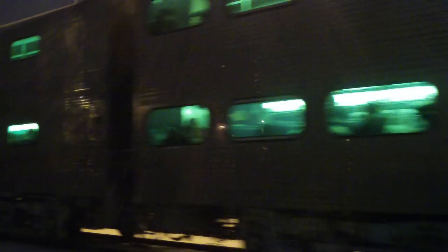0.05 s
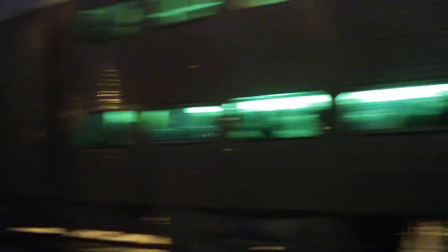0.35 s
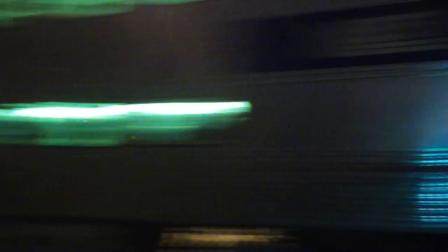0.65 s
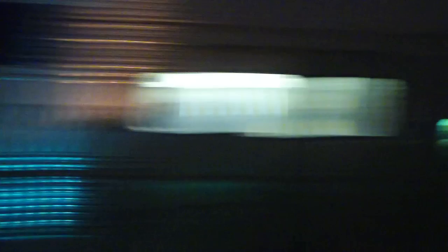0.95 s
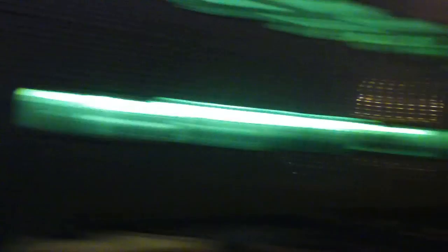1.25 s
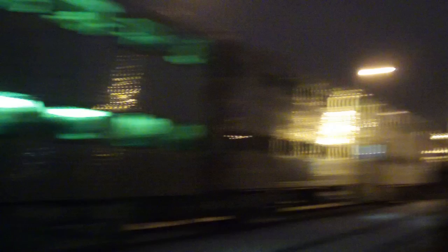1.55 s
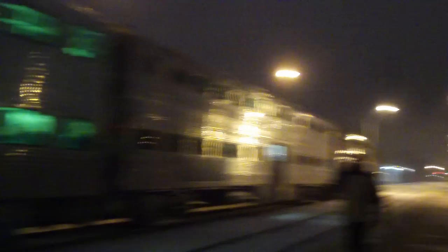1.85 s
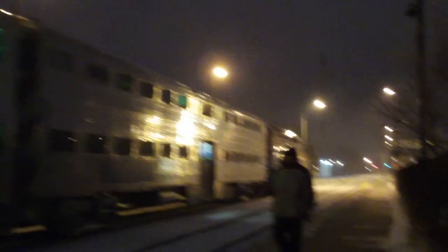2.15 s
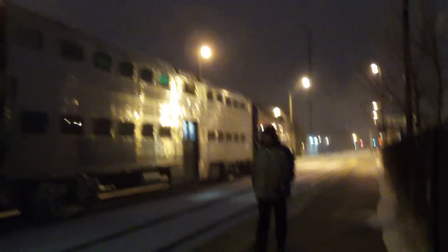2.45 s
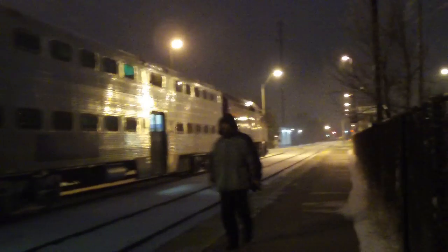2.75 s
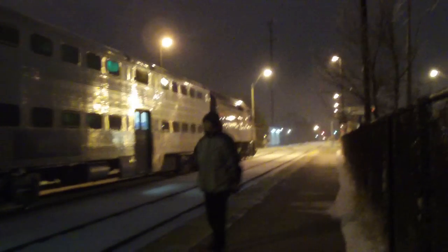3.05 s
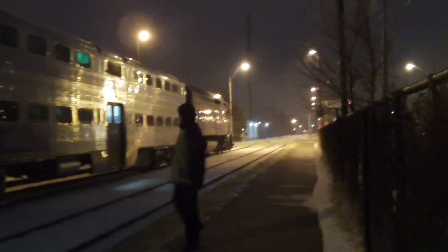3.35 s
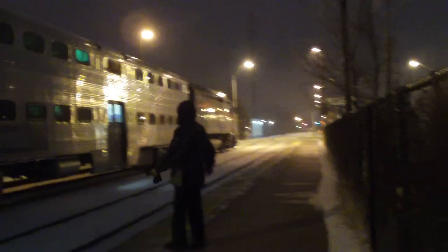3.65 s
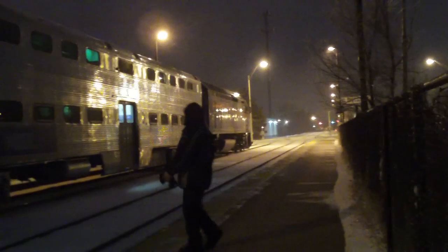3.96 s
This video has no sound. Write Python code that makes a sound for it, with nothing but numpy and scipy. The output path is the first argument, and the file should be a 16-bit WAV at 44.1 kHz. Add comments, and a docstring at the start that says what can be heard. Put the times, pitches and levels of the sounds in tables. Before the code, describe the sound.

A diesel train slows with a throbbing rumble, hissing brake air and a clanging bell.

```python
"""A deep, throbbing exhaust and rumbling wheels: a diesel train slows along a platform at night.
The exhaust throbs once per turn of the engine's shaft, and the gears whine lower as speed drops.
The train's bell swings at a steady beat; a smaller, quicker bell rings far off. Brake air spits
and then hisses on, the brake shoes rub, squeal and grab, and small hard parts tick."""
import sys
import numpy as np
from scipy import signal
from scipy.fft import rfft, irfft
from scipy.io import wavfile
from scipy.ndimage import map_coordinates

SR = 44100
rng = np.random.default_rng(int(sys.argv[2]) if len(sys.argv) > 2 else 0)


def transcribe(signal):
    """Save signal, clipped to [-1, 1], as a 16-bit WAV file at the path in sys.argv[1]."""
    frames = np.atleast_2d(signal).T
    limited = np.clip(frames, -1, 1)
    pcm = np.round(limited * 32767).astype(np.int16)
    wavfile.write(sys.argv[1], SR, pcm)


N = 176400


def undb(db):
    """Turn decibels (dB) into a number to multiply by."""
    return 10 ** (np.asarray(db) / 20)


def unit(x):
    """Scale a signal so that its average strength (rms) is 1."""
    return x / np.sqrt(np.mean(x ** 2))


def curve(t, rows, column=1):
    """Follow one column of a table over time, in straight lines from row to row."""
    rows = np.array(rows)
    return np.interp(t, rows[:, 0], rows[:, column])


def swell(t, at, spread):
    """A smooth hill that rises to 1 and falls again."""
    return np.exp(-.5 * ((t - at) / spread) ** 2)


def wander(rate_hz):
    """A smooth random wobble of about size 1; a higher rate makes it quicker."""
    freqs = np.arange(N + 1) * SR / (2 * N)
    spectrum = rfft(rng.standard_normal(2 * N)) * np.exp(-(freqs / rate_hz) ** 2)
    return unit(irfft(spectrum))[:N]


def noise(colour):
    """Noise shaped by rows of pitch in Hz and level in dB, fading out below the first row."""
    freqs = np.arange(1, N // 2 + 2) * SR / N
    hz, db = np.array(colour).T
    gain = undb(np.interp(np.log(freqs), np.log(hz), db)) * np.minimum(freqs / hz[0], 1) ** 2
    return unit(irfft(rfft(rng.standard_normal(N)) * gain, N))


def resonance(hz, width_hz):
    """Noise ringing around one pitch: the narrower it is, the more like a note."""
    freqs = np.arange(N // 2 + 1) * SR / N
    damping = (1 + ((freqs - hz) / width_hz * 2) ** 4) ** .5
    return unit(irfft(rfft(rng.standard_normal(N)) / damping, N))


def engine(t):
    """The muffler rounds the firings into a deep tone that sags once a turn; a generator hums along."""
    # Each row: time in seconds, level in dB, depth of the throb from 0 to 1.
    exhaust = [(0, -16.5, 0.49), (.8, -12.5, 0.83), (1.45, -13, 0.82), (2.1, -11.5, 0.79), (2.8, -12, 0.71),
               (3.3, -10.5, 0.72), (3.7, -8.5, 0.52), (4, -7, 0.85)]
    # Each row: pitch as a multiple of the shaft's speed, level in dB.
    overtones = [(5, -30), (6, -33), (16, -37), (17, -45.5), (19, -53), (25, -45)]
    # Each row: pitch in Hz, level in dB.
    generator_hum = [(120, -41), (180, -46.5)]
    shaft_hz, firings_per_turn = 8.548, 8
    first_dip_s, dip_width_turns, bend_radians = .057, .29, .043
    turns = shaft_hz * (t - first_dip_s) + .01 * wander(1.56)
    dip = swell(np.sin(np.pi * turns), 0, np.pi * dip_width_turns)
    throb = 1 - curve(t, exhaust, column=2) * dip
    firing = np.sin(2 * np.pi * firings_per_turn * turns - bend_radians * np.sin(2 * np.pi * turns))
    out = unit(throb * firing) * undb(curve(t, exhaust) + .5 * wander(36))
    for multiple, db in overtones:
        out += undb(db + 2 * wander(1)) * unit(np.sin(2 * np.pi * (multiple * turns + rng.random())))
    for hz, db in generator_hum:
        out += undb(db + 2 * wander(6.3)) * unit(np.sin(2 * np.pi * hz * t))
    return out


def wheels(t):
    """Rolling wheels rumble, and the nearest ones murmur as they pass."""
    # Each row: pitch in Hz, relative level in dB.
    rumble_colour = [(15, -28), (28, 1), (50, -2.5), (85, 1.5), (105, -8), (160, -13.5), (260, -14.5),
                     (400, -18.5), (550, -23.5), (1100, -27.5), (1600, -30), (2300, -32), (3800, -43.5),
                     (8000, -41.5), (12500, -50.5), (15000, -60)]
    # Each row: pitch and width in Hz, loudest moment and spread in seconds, level in dB.
    murmurs = [(625, 180, 0.42, 0.43, -43), (376, 69, .1, 0.38, -41.5), (180, 59, 2.2, 0.77, -37.5),
               (338, 78, 4.02, 0.79, -38)]
    out = noise(rumble_colour) * undb(-24.5 + 1.4 * wander(2.1))
    for hz, width, at, spread, db in murmurs:
        out += undb(db) * swell(t, at, spread) * resonance(hz, width)
    return out


def gears(t):
    """The gears whine, sinking in pitch as the train slows."""
    # Each row: starting pitch in Hz, loudest moment and spread in seconds, level in dB,
    # wobble in radians.
    whines = [(434.7, 1.34, 0.51, -38.5, .6), (276.4, 1.83, .65, -37, 0.76), (283, 3.66, 0.86, -39.5, 1.25)]
    slowing_per_s = .057  # share of the starting speed lost each second
    travel = t - slowing_per_s * t ** 2 / 2
    out = 0
    for hz, at, spread, db, wobble in whines:
        level = undb(db + 2.5 * wander(14)) * swell(t, at, spread)
        out += level * unit(np.sin(2 * np.pi * hz * travel + wobble * wander(14)))
    return out


def bell_stroke(t, at, modes, favoured_hz=None):
    """Each of a struck bell's notes (modes) builds, wavers and dies; the station's echo lingers."""
    echo_db, echo_fade_s, favour_db = -27, 1, 6
    age = np.maximum(t - at, 0)
    echo_shape = (1 - np.exp(-age / .017)) * undb(-60 * age / echo_fade_s)
    out = 0
    for hz, db, fade, rise, waver_hz, depth in modes:
        waver = 1 + depth * np.cos(2 * np.pi * waver_hz * age)
        level = (1 - np.exp(-age / rise)) * undb(-60 * age / fade) * waver
        tone = np.sin(2 * np.pi * (hz * age + rng.random()))
        shimmer = .12 * hz / modes[0][0] * resonance(hz, width_hz=hz / 45)
        echo = level.max() * undb(echo_db) * echo_shape * resonance(hz, width_hz=10)
        boost_db = favour_db * swell(hz, favoured_hz, favoured_hz / 10) if favoured_hz else 0
        out += undb(db + boost_db) * (level * (tone + shimmer) + echo)
    return out


def train_bell(t):
    """The train's bell swings and is struck at a steady beat."""
    # Each row: pitch in Hz, relative level in dB, seconds to fade by 60 dB, seconds to build up,
    # wavers per second, depth of the waver from 0 to 1.
    modes = [(2303, -0.5, 0.71, 0.0035, 19, 0.06), (2062, 10.5, 0.29, 0.09, 3.9, 0.5),
             (3120, -23, 0.94, .002, 24, 0.4), (3800, -12.5, 0.66, 0.0017, 33.4, .55),
             (5800, -23.5, 0.58, .002, 27, .4), (6100, -19, .35, 0.0018, 41, 0.4),
             (9846, -21, 0.4, .002, 30, .4)]
    # Each row: start in seconds, relative level in dB.
    strokes = [(-.15, -24), (.652, -20), (1.572, -28.5), (2.489, -37), (3.389, -30)]
    return sum(undb(db) * bell_stroke(t, at, modes) for at, db in strokes)


def far_bell(t):
    """A smaller bell rings far off; each hit of its clapper brings out one note."""
    # Each row: the same columns as the modes of the train's bell.
    modes = [(2121, 0, .7, .003, 9, .3), (2693, -7, .7, .003, 13, .3), (3306, -3, .35, .002, 21, .4),
             (3955, -7, .4, .002, 17, .4), (4850, -5, .2, .002, 29, .4), (6142, -5, .2, .002, 33, .4)]
    # Each row: start in seconds, relative level in dB, pitch of the favoured note in Hz.
    strokes = [(0, -50, 2121), (.9, -48, 2121), (1.509, -38, 2121), (1.81, -39, 3306), (2.429, -42, 2121),
               (2.69, -43, 2693), (2.986, -37.5, 2121), (3.284, -37.5, 6142), (3.575, -38, 3306),
               (3.884, -39.5, 4850)]
    return sum(undb(db) * bell_stroke(t, at, modes, hz) for at, db, hz in strokes)


def shoe_rub(t):
    """The brake shoes ring and chatter as they rub on the wheels."""
    # Each row: pitch and width in Hz, relative level in dB.
    shoe_notes = [(1164, 147, -0.5), (1048, 45, -10), (972, 73, -6), (720, 200, -3.5)]
    # Each row: time in seconds, level in dB.
    rub_level = [(0, -57), (.9, -42), (1.3, -40), (2.1, -37.5), (2.65, -36.5), (2.85, -37), (3.13, -35),
                 (3.22, -40), (3.36, -37), (3.45, -38), (4, -42)]
    chatter_hz, chatter_depth = 34.17, .21
    rub = unit(sum(resonance(hz, width) * undb(db) for hz, width, db in shoe_notes))
    chatter = 1 + chatter_depth * np.sin(2 * np.pi * chatter_hz * t + 2.5 * wander(8.2))
    return rub * chatter * undb(curve(t, rub_level))


def brake_air(t):
    """Air spits from a valve, then escapes in a long hiss that rings one resonance after another."""
    # Each row of both: pitch in Hz, relative level in dB.
    spit_colour = [(2400, -8), (3150, 1.5), (4100, -3), (5000, -4.5), (6200, -6.5), (7400, -1.5),
                   (8400, 1.5), (9500, -2.5), (10500, -3.5), (12400, 0), (13400, -5), (15000, -11)]
    hiss_colour = [(600, -14), (1300, 2.5), (1700, 2), (2200, 1.5), (2650, 3), (3300, 4), (4400, -1.5),
                   (4900, 0.5), (5900, -1.5), (6700, -0.5), (7200, 4), (8900, 3.5), (9800, 2), (11000, 3),
                   (12900, 8), (13500, -5.5), (15200, -4)]
    # Each row of both: time in seconds, relative level in dB.
    spit_level = [(.39, -51), (.43, -36), (.72, -33), (.86, -38.5), (1.05, -34.5), (1.3, -38), (3.5, -44),
                  (4, -47)]
    hiss_level = [(.96, -49), (1.1, -31), (1.3, -30), (1.55, -26.5), (1.9, -27.5), (2.4, -28), (3.1, -30),
                  (3.5, -33.5), (3.72, -33), (3.8, -34.5), (4, -39)]
    # Each row: pitch and width in Hz, loudest moment and spread in seconds, relative level in dB.
    air_notes = [(3280, 500, 1.19, 0.094, -39), (2950, 400, 1.254, 0.084, -36.5),
                 (8280, 600, 1.37, 0.22, -32), (9070, 510, 1.47, 0.19, -35), (10850, 650, 1.57, 0.065, -36),
                 (10800, 1400, 1.48, 0.36, -34), (12100, 550, 1.13, 0.083, -37),
                 (8100, 570, 1.85, 0.037, -35), (12540, 530, 2.24, 0.41, -34.5),
                 (12700, 580, 3.03, 0.26, -36), (13800, 1500, 2.2, .55, -40.5), (7150, 100, 4, 0.96, -44.5),
                 (4780, 250, 2.13, 0.68, -43.5), (6300, 170, 1.82, .07, -43), (8260, 170, 2.34, 0.091, -41),
                 (9300, 290, 2.36, .2, -42), (5250, 150, 3.32, 0.43, -46), (5560, 94, 3.6, 0.32, -48),
                 (3220, 310, 2.33, 0.16, -39), (3580, 340, 3, 0.26, -42), (4080, 380, 2.23, 0.21, -42),
                 (1680, 180, 1.52, 0.091, -43), (2160, 610, 3.9, 1, -41), (1410, 410, 3.56, .4, -44.5)]
    jet = noise(spit_colour) * undb(curve(t, spit_level))
    jet += noise(hiss_colour) * undb(curve(t, hiss_level))
    for hz, width, at, spread, db in air_notes:
        jet += resonance(hz, width) * swell(t, at, spread) * undb(db + .75 * wander(23))
    flicker_db = .62 * wander(48) + .53 * wander(4)
    return flutter(bounce(jet, t)) * undb(flicker_db)


def bounce(jet, t):
    """The hiss bounces off the ground and the train's sides; the slowly shifting echoes colour it."""
    # Each row: delay in milliseconds, relative level in dB, drift in milliseconds per second.
    reflections = [(.9, -30, 0.016), (2.3, -25, -0.043), (3.7, -16, 0.015), (6.1, -14.5, 0.065),
                   (11.3, -17, -0.036)]
    echoes = 0
    for delay_ms, db, drift in reflections:
        sent_at = t - (delay_ms + drift * t) / 1000
        echoes += undb(db) * map_coordinates(jet, [sent_at * SR], order=3, mode="mirror")
    return (jet + echoes) * undb(-1.35)


def flutter(jet):
    """Each narrow band of pitches in the air jet swells and sinks on its own."""
    band_hz, depth_db, rate_hz = 330, 1.5, 7
    freqs, times, bands = signal.stft(jet, SR, nperseg=512)
    chance = rng.standard_normal((int(SR / 2 / band_hz) + 2, int(2 * rate_hz * N / SR) + 2))
    grid = np.meshgrid(freqs / band_hz, 2 * rate_hz * times, indexing="ij")
    sway = map_coordinates(chance, grid, mode="mirror")  # glide between the random values
    return signal.istft(bands * undb(depth_db * sway), SR)[1][:N]


def shoe_squeal(t):
    """The brake shoes squeal briefly on a few high notes."""
    # Each row: pitch and width in Hz, loudest moment and spread in seconds, level in dB.
    squeals = [(4790, 130, .925, .025, -41), (4850, 200, 1.02, .07, -47), (5350, 300, .93, .13, -46),
               (8460, 200, .92, .08, -46), (9630, 220, .915, .045, -41.5), (9960, 220, .87, .045, -42.5)]
    return sum(resonance(hz, width) * swell(t, at, spread) * undb(db + 2 * wander(27.6))
               for hz, width, at, spread, db in squeals)


def shoe_grabs(t):
    """The shoes grab the wheel in short jerks, each ringing a few unsteady notes."""
    # Each row: time in seconds, relative level in dB.
    grabs = [(1.9, -32), (2.395, -32), (2.515, -32), (2.615, -30.5), (2.665, -31.5), (2.953, -27.5),
             (3.022, -30), (3.052, -30), (3.073, -30), (3.103, -29), (3.124, -30.5), (3.148, -28.5),
             (3.34, -30), (3.362, -32)]
    # Each row: pitch in Hz, relative level in dB.
    notes = [(1165, -5), (1128, -6.5), (969, -3.5)]
    grip = sum(undb(db) * swell(t, at, spread=.005) for at, db in grabs)
    judder = sum(undb(db) * unit(np.sin(2 * np.pi * hz * t + 1.9 * wander(25))) for hz, db in notes)
    return grip * judder


def ticks(t):
    """Small hard parts snap and knock; they are too small to sound low notes."""
    # Each row: start in seconds, peak level in dB, pitch and width in Hz, decay time in seconds.
    knocks = [(2.6948, -10.5, 3100, 2200, .0007), (2.7002, -15, 2400, 1200, .0008),
              (3.575, -27.5, 3800, 3200, .012), (3.884, -31, 3000, 3000, .012)]
    lowest_hz = 1750
    cut_lows = signal.butter(6, lowest_hz, "high", fs=SR, output="sos")
    out = 0
    for at, db, hz, width, decay in knocks:
        burst = (t >= at) * np.exp(-np.abs(t - at) / decay) * resonance(hz, width)
        burst = signal.sosfilt(cut_lows, burst + 1e-18)
        out += undb(db) * burst / np.abs(burst).max()
    return out


def scene():
    """Add up everything heard from the platform, in one channel."""
    t = np.arange(N) / SR
    running = engine(t) + wheels(t) + gears(t)
    bells = train_bell(t) + far_bell(t)
    brakes = shoe_rub(t) + brake_air(t) + shoe_squeal(t) + shoe_grabs(t)
    return (running + bells + brakes + ticks(t))[None]


def record(dry):
    """Cut away the very highest treble."""
    top_hz = 15300
    return signal.sosfilt(signal.ellip(10, .2, 80, top_hz, fs=SR, output="sos"), dry)


dry = scene()
out = record(dry)
transcribe(out)
```